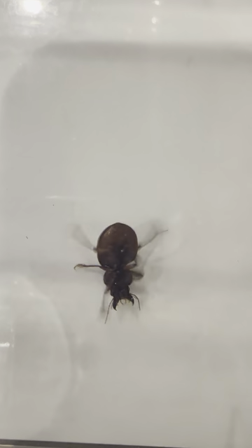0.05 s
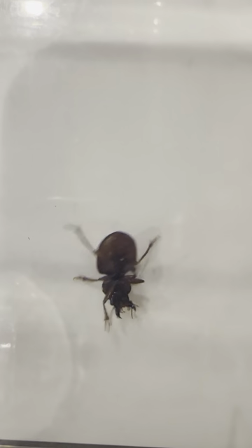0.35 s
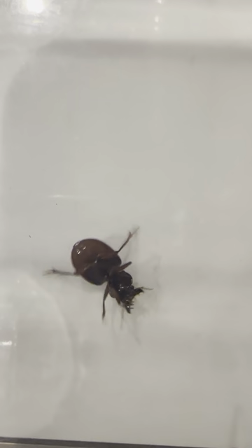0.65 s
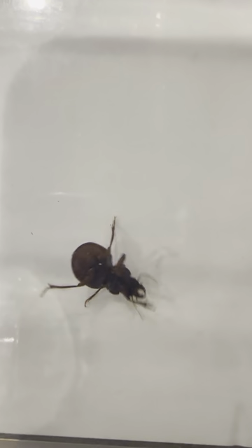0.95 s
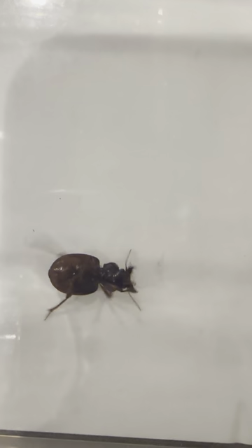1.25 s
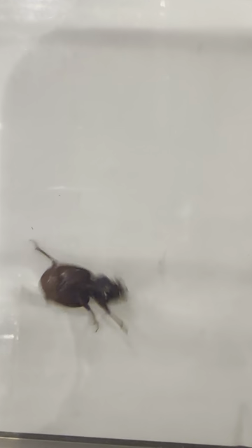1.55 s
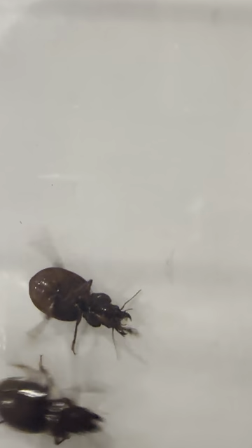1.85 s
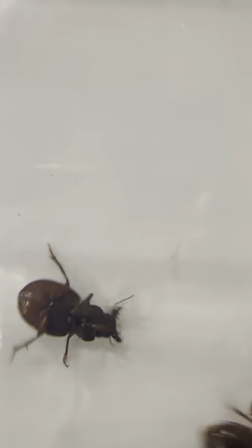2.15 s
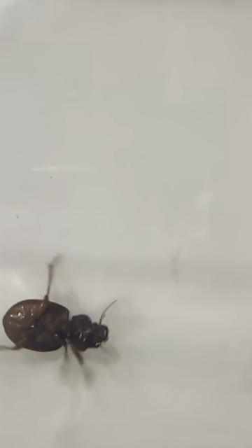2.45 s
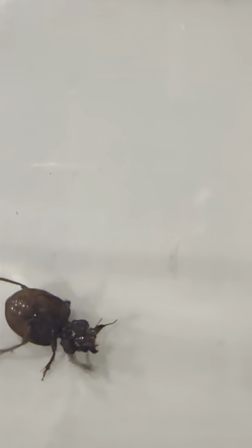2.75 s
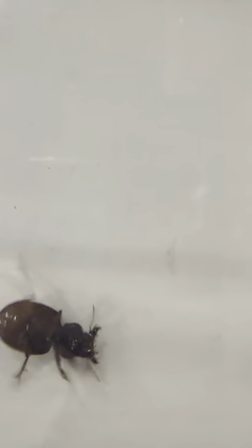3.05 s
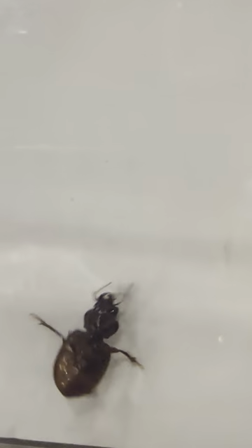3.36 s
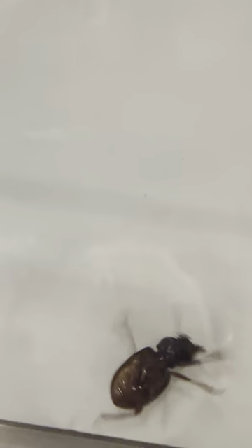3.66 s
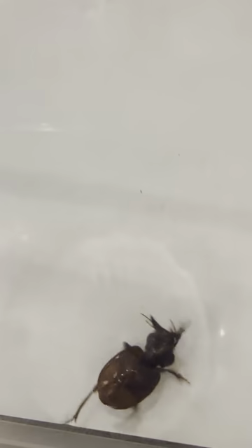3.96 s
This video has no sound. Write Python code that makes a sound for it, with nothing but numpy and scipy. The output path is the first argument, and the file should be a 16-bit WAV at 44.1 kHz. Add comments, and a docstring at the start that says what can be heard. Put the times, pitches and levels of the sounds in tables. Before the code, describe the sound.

A beetle's claws tick and scratch on thin plastic, ending with handling rustle and a thump.

```python
"""Inside a thin plastic tub, close to the microphone, a beetle scrabbles about over a low room hum.
Each claw tap travels through the sheet as a bending wave, treble first, so it lands as a tiny falling
chirp; dragged legs stick and slip in between. Near the end the tub is handled: a rustle, sharp clicks,
low bumps around one deep thump, and a hollow, rattling knock."""
import sys
import numpy as np
from scipy import signal
from scipy.fft import rfft, irfft
from scipy.io import wavfile
from scipy.ndimage import uniform_filter1d

SR = 44100
rng = np.random.default_rng(int(sys.argv[2]) if len(sys.argv) > 2 else 0)


def unload_audio(sound):
    """Save the sound as a 16-bit wav file, at the path given as the first command line argument."""
    columns = np.transpose(np.atleast_2d(sound))
    # keep every value between -1 and 1, then stretch to whole-number steps
    steps = np.round(np.clip(columns, -1, 1) * 32767)
    wavfile.write(sys.argv[1], SR, steps.astype(np.int16))


N = 176400
SIZE, LEAD = 16384, 256   # samples in one contact's buffer, and of its pre-roll
TIME, HZ = np.arange(SIZE) / SR, np.maximum(np.fft.rfftfreq(SIZE, 1 / SR), 1)

# tone of the plastic sheet: freq_hz, gain_db
SHEET_EQ = [(40, -20), (120, -2), (220, -0.5), (480, -4), (950, -7), (1500, -14), (2400, -8), (3200, -9),
            (4100, -24), (7000, -17.5), (11000, -39), (16000, -38)]


def from_db(db):
    """Decibels to gain."""
    return 10 ** (np.asarray(db) / 20)


def rms_one(x):
    """Scale to rms 1."""
    return x / np.sqrt(np.mean(x ** 2) + 1e-20)


def gain_at(eq, hz):
    """Gain of an EQ curve of (freq_hz, gain_db) points."""
    freq_hz, gain_db = np.transpose(eq)
    return from_db(np.interp(np.log(np.maximum(hz, 1)), np.log(freq_hz), gain_db))


def coloured(x, eq):
    """Shape a full-length layer with an EQ curve."""
    return irfft(rfft(x) * gain_at(eq, np.fft.rfftfreq(N, 1 / SR)), N)


def causal(eq):
    """Minimum-phase response of an EQ curve: nothing rings ahead of the attack."""
    cepstrum = irfft(np.log(gain_at(eq, HZ)))
    cepstrum[1:SIZE // 2] *= 2
    cepstrum[SIZE // 2 + 1:] = 0
    return np.exp(rfft(cepstrum))


def resonance(hz, width_hz):
    """Response of one resonance, unity at its peak."""
    return 1 / (1 + 1j * (HZ ** 2 - hz ** 2) / (HZ * width_hz))


def soft_contact(corner_hz):
    """A soft contact loses its treble: two-pole low-pass."""
    return 1 / (1 + 1j * np.sqrt(2) * HZ / corner_hz - (HZ / corner_hz) ** 2)


def bending(travel_ms):
    """Bending waves: travel time, given at 1 kHz, falls with the root of frequency."""
    return np.exp(-4j * np.pi * travel_ms * np.sqrt(HZ / 1000))


def grains(per_s, spread_db):
    """Random slips of uneven size."""
    slips = (rng.random(N) < per_s / SR) * rng.choice([-1, 1], N)
    return slips * from_db(spread_db * np.minimum(rng.exponential(1, N), 3))


def add(out, start_s, spectrum):
    """Turn one contact's spectrum into a wave and mix it in."""
    start = int(start_s * SR) - LEAD
    wave = np.roll(irfft(spectrum), LEAD)[max(-start, 0):max(N - start, 0)]
    out[max(start, 0):max(start, 0) + len(wave)] += wave


def room(hum_hz=88.5, waver_depth=0.24):
    """Steady room tone and a wavering low hum."""
    # colour of the room tone: freq_hz, gain_db
    room_eq = [(15, -60.5), (28, 0.5), (72, 3), (102, 1.5), (175, -4.5), (373, -10), (451, -18), (624, -38),
               (887, -21.5), (1840, -30), (2550, -23.5), (3160, -26), (3920, -46.5), (6400, -28.5),
               (8000, -67), (10400, -84), (16000, -84)]
    waver = rms_one(coloured(rng.standard_normal(N), [(4, 22), (30, -63), (200, -120)]))
    hum = np.sqrt(2) * np.sin(2 * np.pi * hum_hz * np.arange(N) / SR) * (1 + waver_depth * waver)
    room_tone = rms_one(coloured(rng.standard_normal(N), room_eq))
    return from_db(-46.5) * room_tone + from_db(-46) * hum


def rubbing():
    """Fine friction with coarser slips in it, swelling as the tub is handled: a dull rub and a hiss."""
    # fader moves of the two friction layers: time_s, rub_db, hiss_db
    faders = [(0, -54, -70), (1.7, -64.5, -66.5), (2.2, -58.5, -61.5), (2.56, -50, -62), (2.78, -70, -61),
              (3.03, -52.5, -61.5), (3.18, -46.5, -55.5), (3.3, -40.5, -51), (3.42, -31, -46),
              (3.52, -35.5, -48), (3.631, -30, -43), (3.72, -30.5, -50.5), (3.86, -29.5, -59.5),
              (3.93, -39, -50.5), (4, -44, -53.5)]
    # colour of the dull rub: freq_hz, gain_db
    rub_eq = [(40, 13), (100, -10), (235, 9.5), (300, 4.5), (380, 9), (600, 0.5), (810, 1.5), (1000, -6),
              (1400, -11.5), (3000, -25), (8000, -70)]
    # colour of the hiss: freq_hz, gain_db
    hiss_eq = [(500, -28), (1500, -6.5), (2800, 5.5), (4200, -2.5), (7000, 4.5), (9000, -4.5), (11000, -39),
               (13000, -26.5), (14500, -14.5), (15700, -20), (16500, -46)]
    time_s, rub_db, hiss_db = np.transpose(faders)
    out = np.zeros(N)
    for level_db, eq in ((rub_db, rub_eq), (hiss_db, hiss_eq)):
        friction = rng.standard_normal(N) + from_db(2) * rms_one(grains(per_s=480, spread_db=2))
        swell = from_db(np.interp(np.arange(N) / SR, time_s, level_db))
        out += swell * rms_one(coloured(friction, eq))
    return out


def thumps():
    """A bump rocks the whole tub for a few low cycles."""
    # bumps against the tub: start_s, gain_db, pitch_hz
    bumps = [(.04, 20, 52), (0.269, 29.5, 69), (0.325, 22.5, 101), (3.036, 23.5, 128), (3.053, 33, 79),
             (3.385, 31, 95), (3.713, 39.5, 90), (3.7526, 51, 74.4), (3.827, 35, 53), (3.89, 31, 54.6)]
    out, path = np.zeros(N), soft_contact(corner_hz=282) * bending(travel_ms=2.58)
    for start_s, gain_db, pitch_hz in bumps:
        add(out, start_s, from_db(gain_db) * resonance(pitch_hz, width_hz=22) * path)
    return out


def tub_modes():
    """The hollow ring of the tub, one response for each mode."""
    # resonances of the tub: pitch_hz, gain_db, t60_s
    modes = [(186, -7, 0.09), (237, 8.5, 0.18), (290, 8, 0.12), (369.5, 7, 0.054), (467, -11, 0.11),
             (551, 4.5, 0.07), (690, -15.5, 0.13), (737, -7.5, 0.074), (920, -7, 0.05), (1010, -2, 0.023),
             (1216, 3, 0.075), (1273, 8.5, 0.015)]
    return np.array([from_db(db) * resonance(hz, np.log(1000) / (np.pi * t60)) for hz, db, t60 in modes])


def skid(gain_db=-1.5, spread_s=0.0034):
    """A hard claw skids as it lands: a few milliseconds of tiny slips."""
    slips = rng.standard_normal(SIZE) * np.exp(-.5 * ((TIME - LEAD / SR) / spread_s) ** 2)
    return from_db(gain_db) * rfft(np.roll(slips, -LEAD // 2) / np.linalg.norm(slips))


def scuff(gain_db=-9.5, decay_s=0.021, slips_per_s=500):
    """After landing, the claw slides on in a few uneven, dying slips."""
    slips = (rng.random(SIZE) < slips_per_s / SR) * rng.standard_normal(SIZE) * np.exp(-TIME / decay_s)
    return from_db(gain_db) * rfft(slips / (np.linalg.norm(slips) + 1e-9))


def rim_echoes(gain_db, t60_s):
    """Dense reflections from the rim, building up and dying away."""
    tail = rng.standard_normal(SIZE) * from_db(-60 * TIME / t60_s) * (1 - np.exp(-20 * TIME / t60_s))
    return from_db(gain_db) * rfft(tail / np.linalg.norm(tail))


def footfalls(per_s=30):
    """Cues for faint random steps, in the same columns as the taps."""
    return [(when * N / SR, -13.5 + 4 * weight, 335 * 4 ** hardness, 230 * (1 + spot), 3 + 5 * distance)
            for when, weight, hardness, spot, distance in rng.random((int(per_s * N / SR), 5))]


def taps(spot_q=5.9, skid_corner_hz=1330):
    """Each tap is a falling chirp, coloured by the struck spot, rim echoes and the tub's ring."""
    # claws and knocks on the sheet: start_s, gain_db, contact_corner_hz, spot_pitch_hz, travel_ms
    hits = [(0.092, -3, 1180, 268, 7.7), (0.226, -7, 2500, 366, 6.9), (0.2541, 2.5, 990, 403, 2.9),
            (0.312, 11, 340, 238, 5), (0.378, -9.5, 1370.0, 1110, 4.6), (0.4229, 6.0, 420, 232, 7.5),
            (0.5341, -6, 4000.0, 373, 4.1), (0.5974, -0.5, 1690, 213, 4.6), (0.797, -7.5, 4000.0, 320, 7.4),
            (0.9037, -7, 2150, 334, 6), (1.0197, 3.5, 397, 360, 4.5), (1.0790, 2, 1720, 930, 2.7),
            (1.083, 7, 417, 230, 4), (1.139, -4.5, 3420, 526, 4.9), (1.2019, -5, 1620, 229, 7.9),
            (1.4539, 0.5, 1790, 325, 3.9), (1.54, -2, 2920, 227, 3.7), (1.5908, 5.5, 1900, 334, 4),
            (1.621, 6.5, 1490, 395, 2.07), (1.659, -3.5, 2150, 320.0, 4.9), (1.6754, 0.5, 2300, 895, 2.73),
            (1.9506, 7, 3900, 904, 2.17), (1.998, -0.5, 2160.0, 383, 3.9), (2.011, 3.5, 1850, 314, 4.6),
            (2.117, -6, 3430.0, 368, 4.6), (2.2244, -1.5, 1000.0, 304, 5.9), (2.3374, -5, 1860.0, 386, 6.3),
            (2.42, 3.5, 546, 1110, 5.5), (2.519, 9, 3400, 690, 2.38), (2.5227, 14.5, 730, 465, 3.2),
            (2.548, 0.5, 1850, 382, 4.1), (2.556, 11.5, 534, 395, 4.0), (2.5791, 1.5, 2940.0, 217, 3.6),
            (2.593, 0.5, 1360, 225, 4.0), (2.663, 3, 880, 510, 4.1), (2.703, 3, 2580, 455, 3.1),
            (2.729, 9.5, 716, 480, 5.7), (2.822, 12, 804, 475, 4.9), (3.0311, 10, 510, 224, 3.83),
            (3.2256, 10, 2150, 830, 1.29), (3.378, 17, 910, 376, 5.7), (3.4503, 7.5, 1850, 338, 4.6),
            (3.5469, 16, 825, 224, 4.14), (3.688, 21.5, 740.0, 370, 2.08), (3.7101, 22, 1540, 348, 1.6),
            (3.7206, 21, 920, 397, 1.72), (3.7482, 23, 1000, 378, 1.84), (3.7531, 32, 536, 265, 2.9),
            (3.7994, 25.5, 1170, 690, 3.4), (3.811, 22, 950, 720, 3.28), (3.8221, 25, 400, 310, 3.48),
            (3.8355, 18.5, 1170, 670, 3.0), (3.8465, 5, 1100, 796, 3.0), (3.8953, 12.5, 570, 620, 4.8),
            (3.973, 5, 770, 550, 3.2)]
    out, sheet, modes = np.zeros(N), causal(SHEET_EQ), tub_modes()
    for start_s, gain_db, corner_hz, spot_hz, travel_ms in hits + footfalls():
        ring = 0.75 * rng.standard_normal(len(modes)) @ modes
        direct = 1 + 2.7 * resonance(spot_hz, spot_hz / spot_q)
        impact = soft_contact(corner_hz) / (1 + 1j * HZ / (3.6 * corner_hz))   # duller still up top
        slide = (skid() + scuff()) / (1 + (skid_corner_hz / corner_hz) ** 2)   # soft hits hardly slide
        body = direct + ring + rim_echoes(gain_db=-7.5, t60_s=0.03)
        add(out, start_s, from_db(gain_db) * impact * (1 + slide) * sheet * bending(travel_ms) * body)
    return out


def leg_drags():
    """A dragged leg sticks and slips in a short, bright swell."""
    # drags over the plastic: centre_s, half_length_s, level_db
    drags = [(0.26, 0.03, -54.5), (0.665, 0.023, -69), (0.806, 0.034, -55), (1.01, 0.022, -45.5),
             (1.131, 0.064, -49.5), (1.547, 0.018, -57), (1.614, 0.049, -50.5), (1.773, 0.016, -49),
             (1.917, 0.013, -47.5), (2.038, 0.11, -53), (2.165, 0.032, -45.5), (2.231, 0.044, -51.5),
             (2.496, 0.057, -47.5), (2.574, 0.064, -46), (2.874, 0.014, -46.5), (2.94, 0.015, -43),
             (3.076, 0.016, -40), (3.177, .03, -46), (3.214, 0.0095, -45), (3.282, 0.0065, -58)]
    # colour of the scrape: freq_hz, gain_db
    drag_eq = [(100, -9), (230, 8.5), (400, 23), (600, -2), (900, 7), (1500, -3), (2400, 4), (3200, 6),
               (4100, -5), (7000, -5), (9000, -10.5), (11500, -45), (15000, -38), (17000, -26)]
    t = np.arange(N) / SR
    swell = sum(from_db(level_db) * np.exp(-2 * ((t - centre_s) / half_length_s) ** 2)
                for centre_s, half_length_s, level_db in drags)
    return swell * rms_one(coloured(grains(per_s=1800, spread_db=4), drag_eq))


def ticks():
    """Hard clicks with short rim echoes, and a sprinkle of tiny claw scratches."""
    # hard, bright clicks: start_s, gain_db, treble_snap_db
    clicks = [(0.595, -29.5, 2), (0.771, -32, 1), (1.14, -30, 0), (1.5403, -29.5, 3), (1.8529, -27.5, 2),
              (1.9492, -20.5, -1), (1.964, -24.5, 6), (2.003, -25.5, -8), (2.171, -25.5, 0),
              (2.324, -28.5, 9), (2.5803, -19, 3), (2.6412, -23, 12), (2.7335, -29, -2), (3.1296, -20, 20),
              (3.1945, -16, 15), (3.216, -20.5, 25), (3.221, -26, 21), (3.2257, -14, 10), (3.2802, -15, 6),
              (3.343, -19.5, 7), (3.5831, -15, -3), (3.711, -2.5, -3), (3.715, -19, 1), (3.719, -12.5, -1),
              (3.7217, -7, -3), (3.751, -11, -10), (3.7718, -12.5, -3.5), (3.8015, -20, -7),
              (3.846, -20.5, -7), (3.9571, -23.5, -10)]
    # colour of a click: freq_hz, gain_db
    click_eq = [(200, 10), (1000, 5), (3000, 1), (7000, -0.5), (9000, -10.5), (11500, -40.5),
                (15500, -18.5), (17000, -30)]
    out, colour = np.zeros(N), causal(click_eq) * bending(travel_ms=0.757)
    for start_s, gain_db, snap_db in clicks:
        snap = causal([(5000, 0), (13000, snap_db)])
        add(out, start_s, from_db(gain_db) * colour * snap * (2 + rim_echoes(gain_db=-2, t60_s=0.013)))
    scratch = irfft(colour * rim_echoes(gain_db=-43, t60_s=0.014))
    return out + signal.fftconvolve(grains(per_s=13, spread_db=9), scratch)[:N]


def wall_knock(hand_t60_s=0.14):
    """A knock on the wall sets all the modes ringing at once; the holding hand damps them."""
    # knock on the tub's wall: start_s, gain_db
    knocks = [(3.8135, 29)]
    ring = rfft(irfft(tub_modes().sum(axis=0)) * from_db(-60 * TIME / hand_t60_s))
    path = causal(SHEET_EQ) * soft_contact(corner_hz=1600) * bending(travel_ms=4.2)
    out = np.zeros(N)
    for start_s, gain_db in knocks:
        add(out, start_s, from_db(gain_db) * path * ring)
    return out


def scene():
    """Two close microphone ports lose the deepest rumble and fall out of phase in the treble."""
    # stereo width, side against mid: freq_hz, side_db
    width_eq = [(60, -38), (250, -23.5), (700, -14), (2400, -37.5), (4400, -24), (7000, -2), (9000, 4.5),
                (15000, 9.5)]
    mid = room() + rubbing() + leg_drags() + ticks() + thumps() + wall_knock() + taps()
    mid = coloured(mid, [(20, -20), (40, -5), (42, 0)])   # rumble cut
    side = coloured(signal.hilbert(mid).imag, width_eq)   # a quarter cycle from the mid
    return np.array([mid + side, mid - side])


def record(dry, threshold_db=-0.5, release_db_per_s=33, ceiling=0.92, stopband_hz=17000):
    """A limiter ducks on the loudest peaks and recovers slowly; overshoot is rounded; the top is cut."""
    over_db = np.maximum(20 * np.log10(np.abs(dry).max(axis=0) + 1e-9) - threshold_db, 0)
    release_db = release_db_per_s * np.arange(N) / SR
    duck_db = uniform_filter1d(np.maximum.accumulate(over_db + release_db) - release_db, size=128)
    limited = dry * from_db(-duck_db)
    rounded = limited / (1 + (limited / ceiling) ** 8) ** (1 / 8)
    return signal.sosfiltfilt(signal.cheby2(12, 40, stopband_hz, fs=SR, output="sos"), rounded)


dry = scene()
out = record(dry)
unload_audio(out)
```